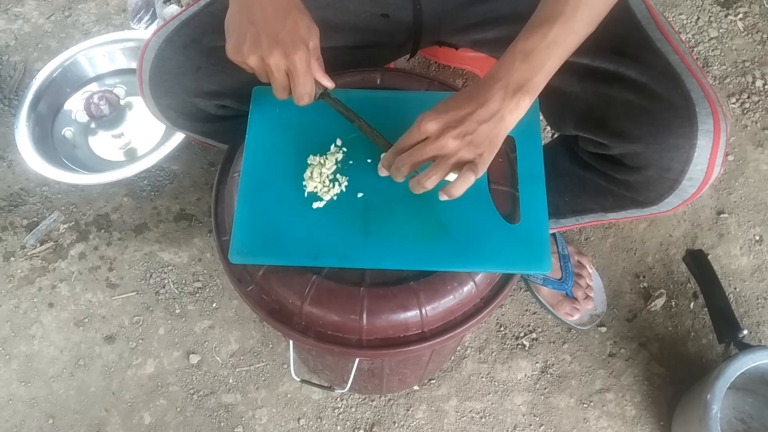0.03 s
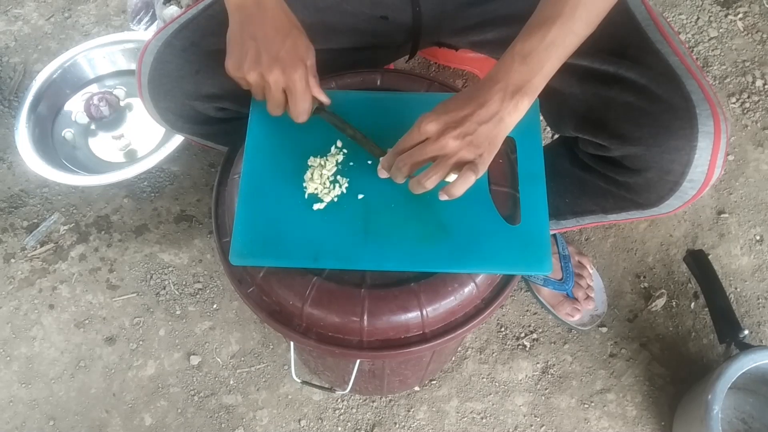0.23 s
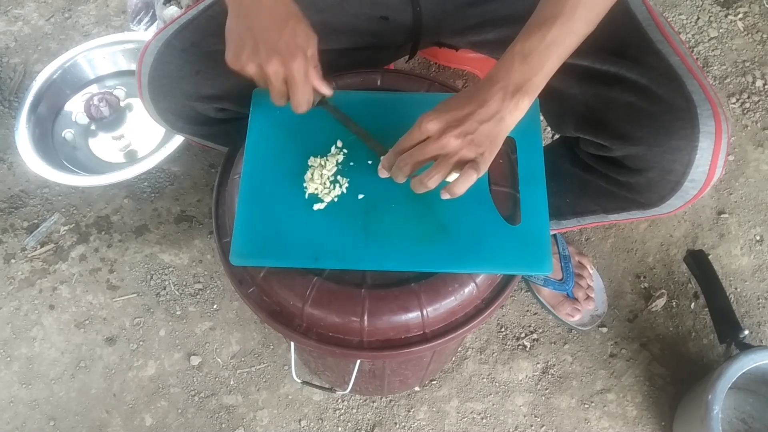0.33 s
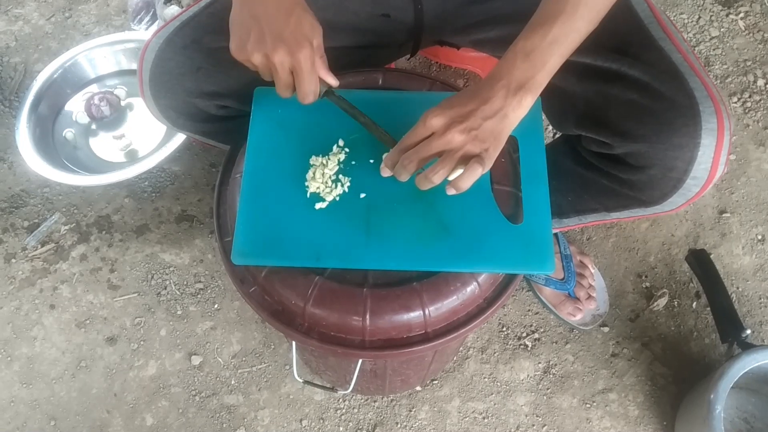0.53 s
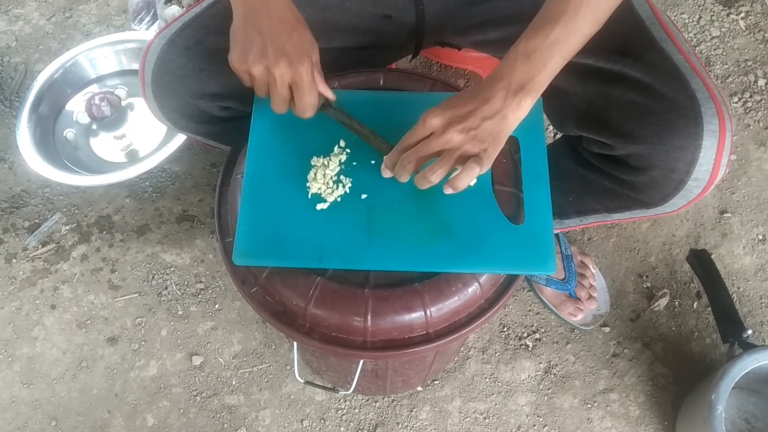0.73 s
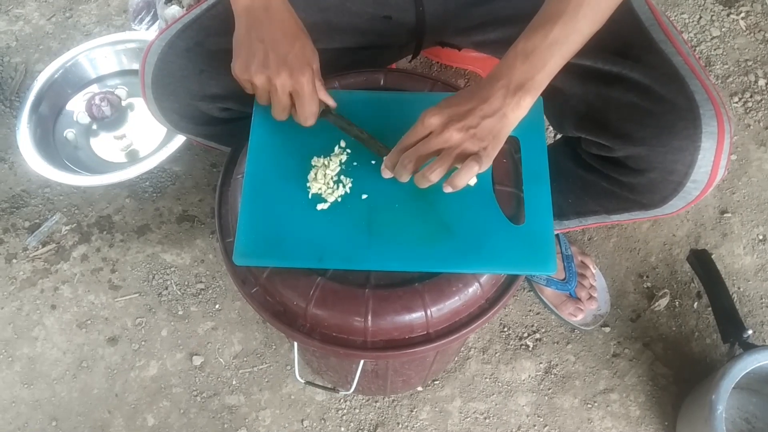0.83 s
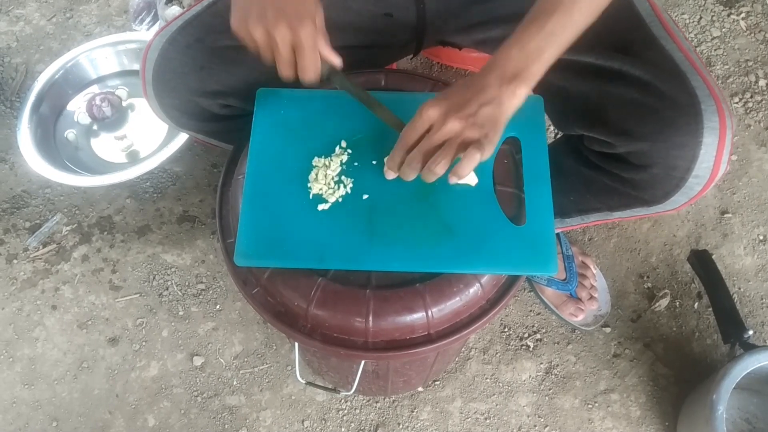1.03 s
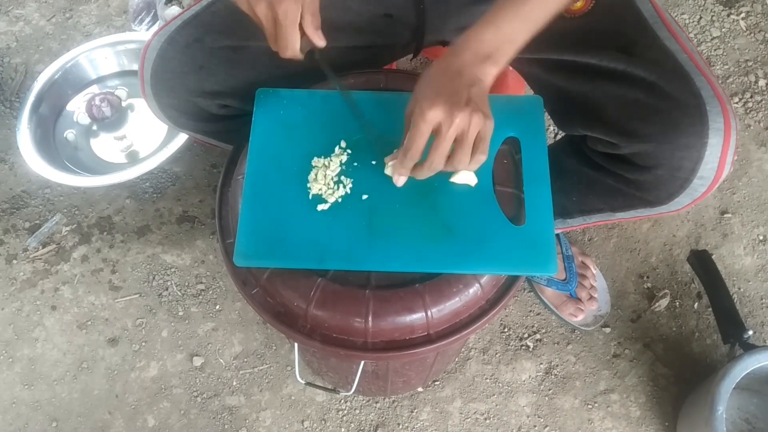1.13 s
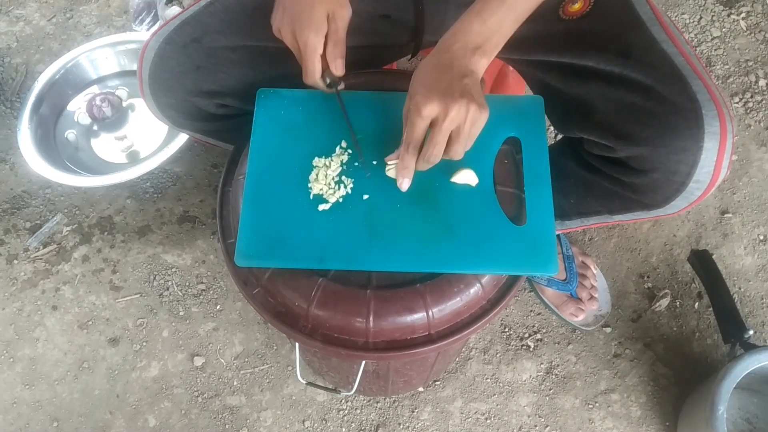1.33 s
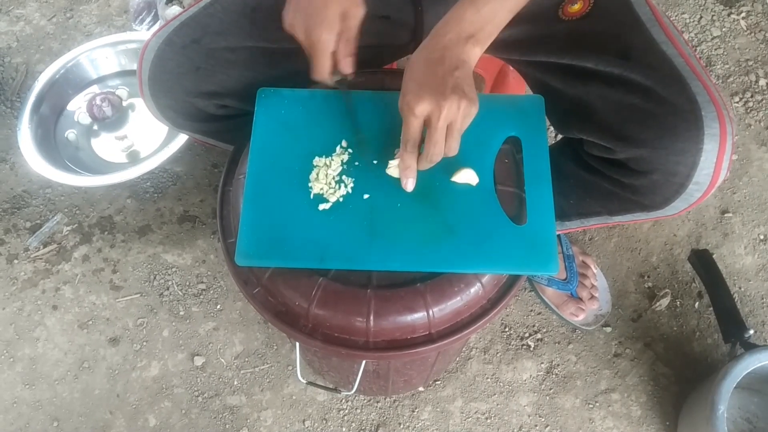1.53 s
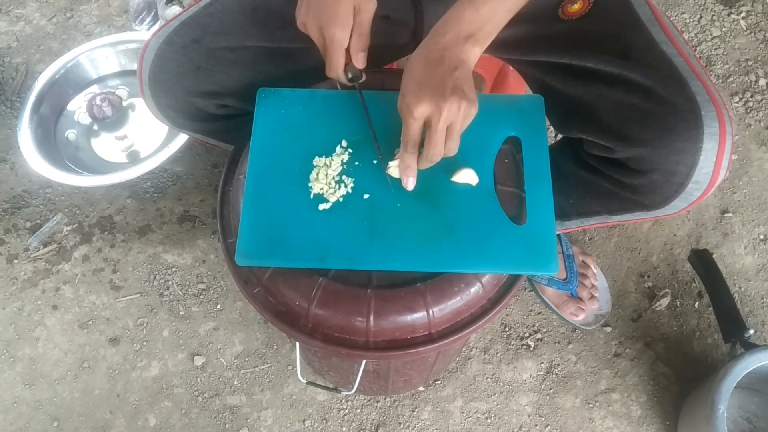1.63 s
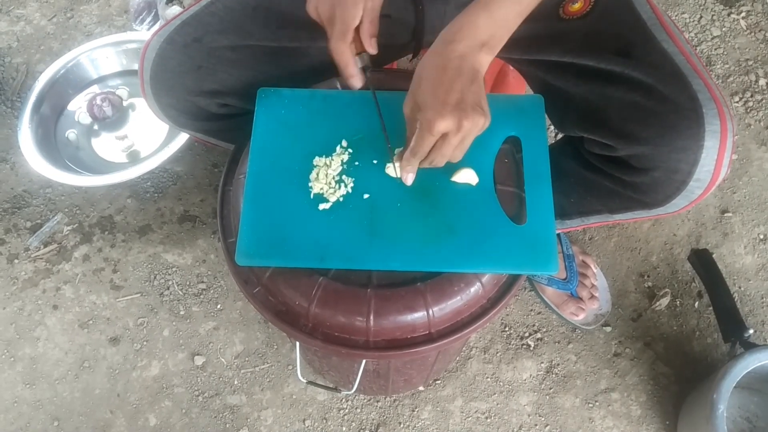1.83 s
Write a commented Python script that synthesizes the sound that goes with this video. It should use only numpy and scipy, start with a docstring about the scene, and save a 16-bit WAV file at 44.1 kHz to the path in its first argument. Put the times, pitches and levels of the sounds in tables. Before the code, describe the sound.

Close stereo phone pickup outdoors: two crisp, hollow knife knocks with garlic crunch and short scrapes, a small tap between them, later light finger rubbing and taps, over low distant rumble and faint hiss.

```python
"""A knife minces garlic on a plastic board on the lid of a hollow plastic bin, outdoors, near a phone.
Far rumble and hiss (shaped noise) last throughout. First the clove crunches (crackling noise), then the blade
knocks on the board (decaying sines and a noisy crack), slides on (scraping noise) and the lid rings.
A faint falling tone (a sine with an overtone) passes behind, then come a soft tap, more crunching and a second
chop. Fingers rustle (soft noise bands) softly during the tone, and again later, when they also tap and slide.
Bin thuds, dry snaps and a short echo go along."""
import sys
import numpy as np
from scipy import signal
from scipy.fft import rfft, irfft, next_fast_len
from scipy.io import wavfile
from scipy.ndimage import uniform_filter1d, map_coordinates

SR = 44100
rng = np.random.default_rng(int(sys.argv[2]) if len(sys.argv) > 2 else 0)


def to_wav(s):
    """Save 16-bit WAV."""
    ch = np.atleast_2d(s).T  # columns
    pcm = np.round(np.clip(ch, -1, 1) * 32767)  # PCM
    wavfile.write(sys.argv[1], SR, pcm.astype(np.int16))


def magnitude_from_level(level_db):
    """Linear magnitude for a level in decibels (20 dB per decade)."""
    exponent = np.asarray(level_db, float) / 20
    return 10 ** exponent


N = 83790
T = np.arange(N) / SR  # time of each sample in seconds


def unit(x):
    """Scale to rms 1."""
    return x / np.sqrt(np.mean(x ** 2) + 1e-20)


def along(points, hz):
    """Read a curve of (pitch_hz, value) points on a log pitch axis."""
    point_hz, value = np.transpose(points)
    return np.interp(np.log(hz + 1), np.log(point_hz + 1), value)


def wobble(rate):
    """A smooth random curve with rate knots a second."""
    knots = rng.standard_normal(int(N * rate / SR) + 4)
    return map_coordinates(knots, [T * rate])


def filtered(x, response):
    """Multiply the spectrum of x by a response, a function of frequency."""
    size = next_fast_len(N + SR // 2)
    hz = np.fft.rfftfreq(size, 1 / SR)
    return irfft(rfft(x, size) * response(hz), size)[..., :N]


# how alike left and right are, 1 = the same: pitch_hz, likeness (no unit)
LIKENESS = [(60, 0.79), (180, 0.95), (550, 0.86), (1650, 0.26), (4970, 0.11), (15000, -0.096)]


def rush(gain, grain_db=0.):
    """Stereo noise of rms 1, most alike in the low pitches; grain_db makes it lumpy."""
    grains_per_s = 2700
    pair = rng.standard_normal((2, N)) * magnitude_from_level(grain_db * wobble(grains_per_s))

    def angle(hz):
        return np.arccos(np.clip(along(LIKENESS, hz), -1, 1)) / 2

    # the angle shares the sound between what both sides have and what differs
    mid, side = filtered(pair, lambda hz: gain(hz) * [np.cos(angle(hz)), np.sin(angle(hz))])
    return unit(np.array([mid + side, mid - side]))


def ring(modes, seconds, soft_hz=99000.0, scatter_db=0., hold=0.):
    """Sum of decaying sines, their sign changing from pair to pair; a soft contact spares the high ones."""
    t = np.arange(int(seconds * SR)) / SR
    total = 0
    for k, (hz, db, t60) in enumerate(modes):
        fade_db = -60 * np.clip(t - hold, 0, None) / t60
        level = magnitude_from_level(db + scatter_db * rng.normal() + fade_db)
        softened = level / (1 + (hz / soft_hz) ** 2)
        total = total + (-1) ** (k // 2) * softened * np.sin(2 * np.pi * hz * t)
    return total


def burst(s, length, rise=0.29):
    """A swell that rises, then falls more slowly and reaches its low floor at 1.44 lengths."""
    times = [s, s + rise * length, s + 0.77 * length, s + 1.44 * length]
    return np.interp(T, times, [0.0043, 0.92, 0.53, 0.0021])


def placed(sounds):
    """Put (start_s, sound) pairs on the time line; the left port hears them a little later."""
    left_lag_s = .0001
    line = np.zeros(N + SR)
    for s, x in sounds:
        line[round(s * SR):][:len(x)] += x
    # half the lag goes to each side
    return filtered(line[:N], lambda hz: np.exp(-1j * np.pi * hz * left_lag_s * np.array([[1], [-1]])))


# colour of the far rumble and hiss: pitch_hz, relative_level_db (per Hz)
FAR_COLOUR = [(12, -39.5), (20, 5), (45, -3.5), (237, -16), (314, -14.5), (492, -17.5), (551, -37.5),
              (652, -22.5), (2000, -29.5), (2440, -27), (9400, -29), (15200, -39), (16500, -49.5)]
# loudness of the far sound before its small random sway: time_s, level_db
FAR_LOUDNESS = [(0, -58), (.08, -56.5), (.3, -57), (.5, -53.5), (.63, -57), (.95, -54.5), (1.1, -57),
                (1.25, -55.5), (1.5, -59), (1.7, -56.5), (1.9, -59.5)]


def background():
    """Far rumble and hiss: coloured noise that swells a little, in patches of time and pitch."""
    hiss = rush(lambda hz: magnitude_from_level(along(FAR_COLOUR, hz)))
    spectrum = signal.stft(hiss, nperseg=512)[2]
    patches = rng.standard_normal(spectrum.shape[1:])
    patches = uniform_filter1d(uniform_filter1d(patches, 10, 0), 10, 1)
    hiss = signal.istft(spectrum * magnitude_from_level(3.0 * unit(patches)), nperseg=512)[1][:, :N]
    level_db = np.interp(T, *np.transpose(FAR_LOUDNESS)) + 0.63 * wobble(8)
    return magnitude_from_level(level_db) * hiss


# path of the faint tone before its random wavering: time_s, pitch_hz, level_db
TONE_PATH = [(.28, 620, -76), (0.341, 585.6, -65), (0.411, 555, -66), (.48, 510, -63), (.54, 479, -67)]


def faint_tone():
    """A far falling tone, perhaps a fowl: a wavering sine with one overtone."""
    overtone_db = 1  # against the lower sine
    s, hz, db = np.transpose(TONE_PATH)
    pitch_hz = np.interp(T, s, hz) * (1 + 0.019 * wobble(60))
    phase = 2 * np.pi * np.cumsum(pitch_hz) / SR
    gain = magnitude_from_level(np.interp(T, s, db, -120, -120) + 6.6 * wobble(27.6))
    # the overtone starts at another point of its swing on the right
    sides = [np.sin(phase) + magnitude_from_level(overtone_db) * np.sin(2 * phase + turn) for turn in (0, 1.8)]
    return gain * np.array(sides)


# how long the echo takes to drop 60 dB: pitch_hz, t60_s
ECHO_TIMES = [(300, 0.23), (3000, 0.29), (12000, 0.21)]


def yard(x):
    """Nearby walls and ground answer with a noisy tail; each frequency dies at its own speed."""
    noise = rng.standard_normal((2, SR // 2))
    hz, t, spectrum = signal.stft(noise, SR, nperseg=256)
    fade = magnitude_from_level(-60 * t / along(ECHO_TIMES, hz)[:, None])
    tail = signal.istft(spectrum * fade, SR, nperseg=256)[1]
    late = np.pad(x, ((0, 0), (200, 0)))  # 200 samples of delay
    return signal.fftconvolve(late, tail / np.linalg.norm(tail[0]), axes=1)[:, :N]


# the bin thuds under the weight of the hands: start_s, pitch_hz, level_db (before the soft start), t60_s
BIN_THUDS = [(0.106, 60.6, -48, 0.41), (0.157, 98, -39.5, 0.21), (0.558, 134, -39.5, .09),
             (0.588, 123, -42, 0.065), (0.679, 75, -41, 0.21), (.762, 98, -36, 0.2)]


def thuds():
    """Low swings of the bin: single decaying sines with a soft start."""
    soft_start = 1 - np.exp(-np.arange(int(.3 * SR)) / SR / 0.0024)
    return placed([(s, soft_start * ring([mode], .3)) for s, *mode in BIN_THUDS])


# fingers rustle among the peel: start_s, nominal_length_s, level_db (before the swell), centre_hz
FINGER_RUSTLES = [(0.289, 0.3, -64, 2230), (1.195, 0.13, -67, 1500), (1.195, 0.088, -59.5, 9330),
                  (1.155, .07, -55.5, 4230), (1.188, 0.082, -58.5, 3270), (1.319, 0.053, -61, 3554),
                  (1.617, 0.068, -51, 3750), (1.792, 0.031, -61.5, 3930)]


def rustle():
    """Dry rubbing: each rustle is a soft, lumpy band of noise that swells and fades."""
    total = 0
    for s, length, db, centre_hz in FINGER_RUSTLES:
        band = rush(lambda hz: 1 / (1 + (4.3 * np.log((hz + 1) / centre_hz)) ** 2), 2.2)
        total = total + magnitude_from_level(db) * burst(s, length, rise=0.42) * band
    return total


# dry snaps of peel and squeaks of the edge:
# start_s, middle_pitch_hz, level_db (each partial is 1.5 dB lower), t60_s, spread (share of the pitch)
PEEL_SNAPS = [(0.103, 3630, -35, 0.026, .04), (.143, 9950, -29, 0.01, .1),
              (.526, 9640, -38.5, 0.0054, 0.23), (0.678, 3960, -27, 0.034, 0.021),
              (1.56, 10770, -30, .004, 0.27), (1.568, 7490, -56, .04, .08)]


def snaps():
    """Each snap is a cluster of three short decaying sines, a little off an even spacing."""
    sounds = []
    for s, hz, db, t60, spread in PEEL_SNAPS:
        partials = [(hz * (1 + spread * (k + .15 * rng.normal())), db - 1.5, t60) for k in (-1, 0, 1)]
        sounds.append((s, ring(partials, .06)))
    return placed(sounds)


# ringing tones of board and lid: pitch_hz, relative_level_db, t60_s (undamped by the hand)
LID_TONES = [(172, -15, 0.17), (250, -21.5, .1), (314, -6, 0.11), (398, -13.5, 0.26), (465, -3.5, 0.13),
             (538, -7.5, .15), (613.4, 0.5, 0.12), (640.8, 0.5, 0.21), (769.6, -12, .07),
             (865, -2.5, 0.049), (1324, -9, 0.049), (1493, -9, 0.047), (1690, -8, 0.064),
             (1984, -9.5, 0.16), (2400, -14.5, 0.059), (2690, -12.5, 0.072)]
# brief clack of the board: pitch_hz, relative_level_db, t60_s (after contact ends)
CLACK_TONES = [(698, 2, 0.0058), (1364, -11.5, 0.013), (1940, 0, 0.011), (2476, 1, .008),
               (3030, -12.5, 0.0089), (4300, -9.5, .008), (5000, -30, 0.0084)]


def board(push, damped_t60):
    """An uneven push rings the lid, damped by the hand, and the board itself."""
    damping = magnitude_from_level(-60 * T[:int(.2 * SR)] / damped_t60)
    body = ring(LID_TONES, .2) * damping + magnitude_from_level(4.5) * ring(CLACK_TONES, .2, soft_hz=1500)
    return signal.fftconvolve(push, body[None] / np.linalg.norm(body), axes=1)[:, :N]


# blade, clove or fingers slide over the board:
# start_s, hold_s, t60_s, scrape_level_db, push_level_db (both before the treble is softened), top_hz
BOARD_SLIDES = [(0.151, 0.0091, 0.17, -29, -30, 11700), (0.758, 0.046, 0.24, -26.5, -28.5, 10600),
                (0.553, .03, .06, -68, -49.5, 1190), (1.421, 0.011, 0.17, -49.5, -40.5, 4440),
                (1.582, 0.0079, 0.091, -54, -44.5, 4000), (1.61, 0.0088, 0.16, -54, -56, 3060),
                (1.683, 0.0053, .08, -58, -59.5, 3400)]
# colour of the scrape: pitch_hz, relative_level_db (per Hz)
SCRAPE_COLOUR = [(700, -25), (1100, -18.5), (1900, -7), (2400, -4.5), (3200, -12.5), (4300, -14.5),
                 (7800, -12), (10900, -19), (15500, -38)]


def slide():
    """Blade, clove or fingers scrape over the plastic: fading lumpy noise that also keeps the lid ringing."""
    sliding_t60 = 0.29  # s, the hand that holds the board damps it
    grit = rush(lambda hz: magnitude_from_level(along(SCRAPE_COLOUR, hz)), 3.3)
    rub = rush(np.ones_like, 2.4)
    scrape = push = 0
    for s, hold, t60, scrape_db, push_db, top_hz in BOARD_SLIDES:
        rise = np.clip((T - s) / 0.0027, 0, 1)
        shape = rise * magnitude_from_level(-60 * np.clip(T - s - hold, 0, None) / t60)
        both = shape * np.array([magnitude_from_level(scrape_db) * grit, magnitude_from_level(push_db) * rub])
        both = filtered(both, lambda hz: 1 / (1 + (hz / top_hz) ** 4))
        scrape, push = scrape + both[0], push + both[1]
    return scrape + board(push, sliding_t60)


# the blade breaks through the clove:
# start_s, nominal_length_s, crackle_level_db, push_level_db (on the board), both before the swell
CLOVE_CRUNCHES = [(.097, .02, -35.5, -44), (.121, 0.037, -47, -51), (.139, 0.033, -37.5, -43),
                  (0.319, 0.034, -54.5, -67), (0.452, 0.017, -54.5, -74.5), (.528, 0.033, -50, -83.5),
                  (0.672, 0.02, -37, -42.5), (0.698, 0.017, -45, -56), (0.7266, .012, -38.5, -45),
                  (0.742, .012, -45, -50.5), (.935, 0.024, -50.5, -67), (1.212, 0.029, -59, -72.5)]
# colour of the crackle: pitch_hz, relative_level_db (per Hz)
CRACKLE_COLOUR = [(1200, -38), (2200, -20), (3700, -13), (5800, -19), (9500, -8.5), (12000, -17),
                  (14600, -20.5), (16000, -31.5)]


def crunch():
    """The clove breaks with grainy noise, and duller noise pushes the board into ringing."""
    pressed_t60 = .07  # s, the hand damps the board more while the blade cuts
    crackle = push = 0
    for s, length, crackle_db, push_db in CLOVE_CRUNCHES:
        swell = burst(s, length)
        crackle = crackle + magnitude_from_level(crackle_db) * swell
        push = push + magnitude_from_level(push_db) * swell
    grains = rush(lambda hz: magnitude_from_level(along(CRACKLE_COLOUR, hz)), 2.5)
    dull = rush(lambda hz: 1 / (1 + (hz / 1700) ** 2))
    return crackle * grains + board(push * dull, pressed_t60)


# blade and finger blows on the board: start_s, clack_level_db (played 5.5 dB lower, before its tone levels),
# hardness_hz, ringing_level_db (before its tone levels), contact_s, crack_level_db
BOARD_BLOWS = [(.1552, -8, 3430, -24, 0.0027, -25), (0.5564, -24.5, 630, -49, .003, -53),
               (.7608, -15, 3000, -23.5, 0.0035, -33.5), (1.335, -48, 2005, -67.5, .003, -68),
               (1.4224, -20.5, 1290, -33.5, 0.0048, -36), (1.5815, -37.5, 1290, -44.5, 0.0047, -48),
               (1.645, -42.5, 2500, -55, 0.0028, -50), (1.686, -49, 1200, -58.5, 0.0025, -65)]


def blows():
    """Each blow: a clack and a noisy crack that last while the contact does, and the ringing lid."""
    crack_t60, crack_reach = .007, 3.4  # s; top of the crack over the hardness
    t = T[:int(.4 * SR)]
    sounds = []
    for s, db, hard_hz, ring_db, contact, crack_db in BOARD_BLOWS:
        lowpass = signal.butter(4, min(crack_reach * hard_hz, 16000), fs=SR)
        grit = unit(signal.lfilter(*lowpass, rng.standard_normal(len(t))))
        ringing = magnitude_from_level(ring_db) * ring(LID_TONES, .4, hard_hz, scatter_db=2.5)
        clack = magnitude_from_level(db - 5.5) * ring(CLACK_TONES, .4, hard_hz, 1.7, contact)
        crack = magnitude_from_level(crack_db - 60 * np.clip(t - contact, 0, None) / crack_t60) * grit
        sounds.append((s, ringing + clack + crack))
    return placed(sounds)


def scene():
    """Near sounds with their echo, over the far ones; the thin board gives off little bass."""
    board_low_hz, yard_db = 145, -16
    near = blows() + crunch() + slide()
    near = filtered(near, lambda hz: (1j * hz / (board_low_hz + 1j * hz)) ** 2)
    near = near + thuds() + snaps() + rustle()
    return near + magnitude_from_level(yard_db) * yard(near) + faint_tone() + background()


def low_pass(x):
    """Removes everything above the highest recorded frequency."""
    return signal.sosfilt(signal.butter(12, 16640, fs=SR, output="sos"), x)


# balance of the phone's two ports: pitch_hz, left_minus_right_db
PORT_BALANCE = [(60, 1.5), (130, -1), (290, -1), (640, 0), (1410, -3), (3100, 1.0), (6820, 6.5), (15000, 6)]


def record(dry):
    """The left port hears more treble than the right; the top band is cut."""
    top_hz = 15800
    halves = np.array([[.5], [-.5]])  # each port takes half the difference
    mix = filtered(dry, lambda hz: magnitude_from_level(along(PORT_BALANCE, hz) * halves) / (1 + (hz / top_hz) ** 40))
    return low_pass(mix)


dry = scene()
out = record(dry)
to_wav(out)
```